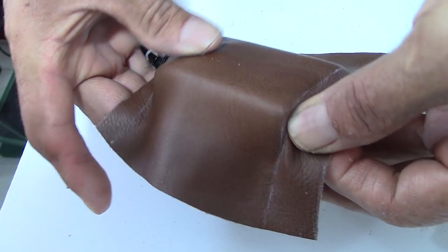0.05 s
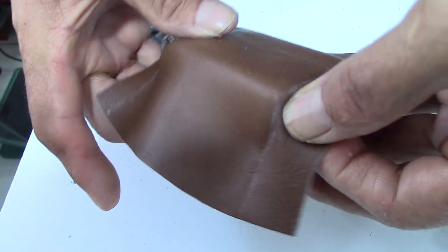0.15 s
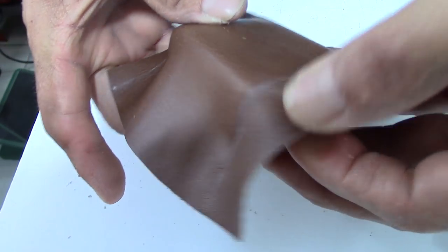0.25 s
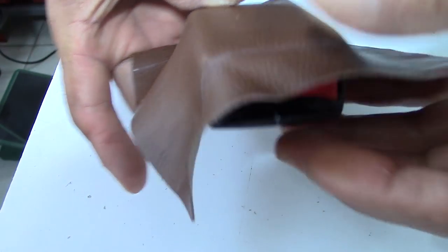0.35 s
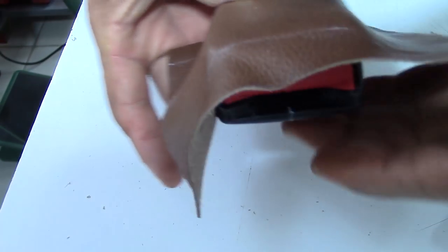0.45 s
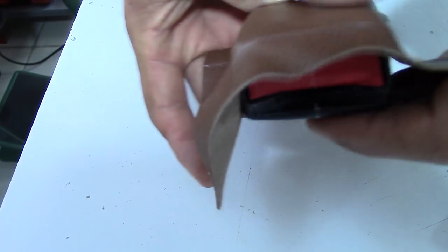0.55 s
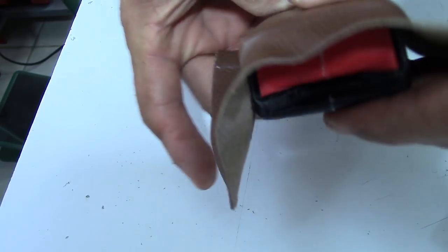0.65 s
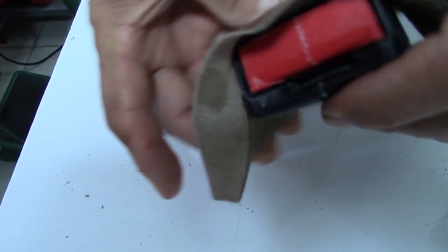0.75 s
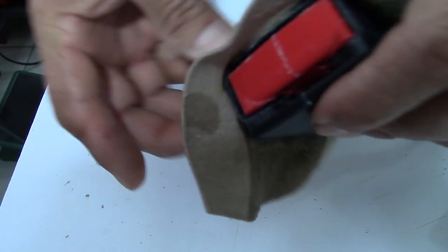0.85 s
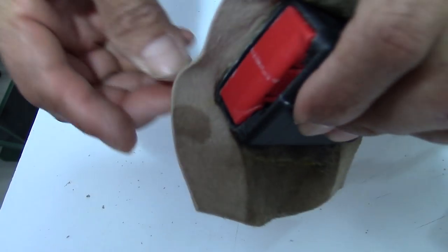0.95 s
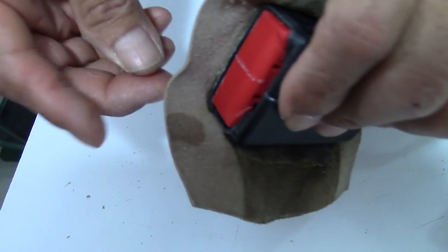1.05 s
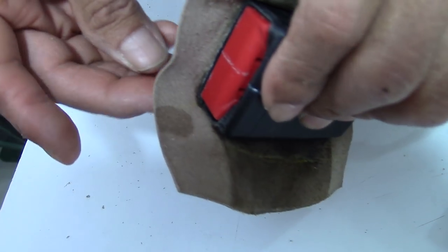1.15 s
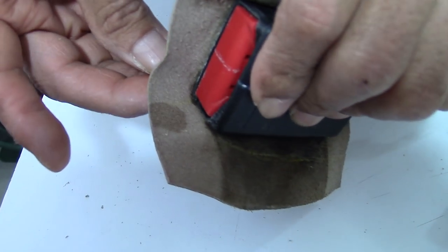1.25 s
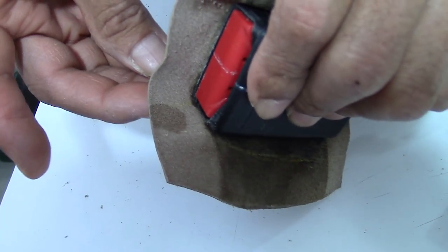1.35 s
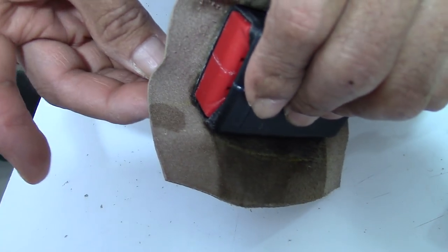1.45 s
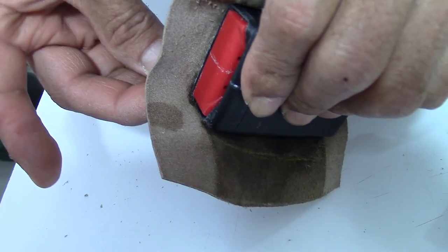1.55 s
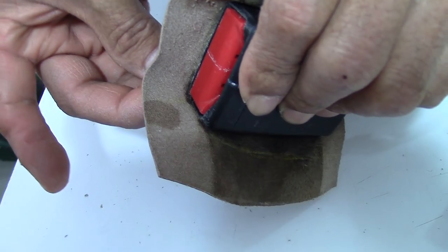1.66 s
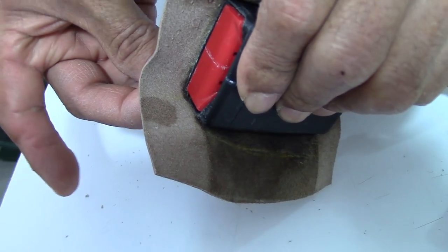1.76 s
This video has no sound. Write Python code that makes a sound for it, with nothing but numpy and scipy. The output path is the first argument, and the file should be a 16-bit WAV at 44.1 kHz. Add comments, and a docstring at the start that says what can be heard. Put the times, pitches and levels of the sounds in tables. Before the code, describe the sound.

Leather rubs on a hollow plastic case, close up in a small room. A light slide of skin leads into a knock at 0.2 seconds and a dull, rasping rub with tiny squeaks. Light ticks come around 0.55, then a stronger knock at 0.6 and a second rub, fading by 0.9. Fingers barely brush until about 1.7 seconds, over a quiet hush and faint hum.

```python
"""A small room, close up: hands work a piece of glued leather round a hollow plastic case.
A light slide of skin leads into two dull stick-slip rubs that shake the case, each set off by a knock
as the grip gives way. The leather's grain rasps and squeaks, and the shell ticks as it is turned.
Then the fingers rest, barely brushing, over the room's hush and a faint hum."""
import sys
import numpy as np
from scipy import signal
from scipy.fft import rfft, irfft, next_fast_len
from scipy.io import wavfile
from scipy.ndimage import map_coordinates

SR = 44100
rng = np.random.default_rng(int(sys.argv[2]) if len(sys.argv) > 2 else 0)


def generate_wav(signal):
    """Clip the signal to [-1, 1] and save it as 16-bit WAV at the path in sys.argv[1]."""
    frames = np.transpose(np.atleast_2d(signal))
    scaled = np.clip(frames, -1, 1) * 32767
    pcm = np.round(scaled).astype(np.int16)
    wavfile.write(sys.argv[1], SR, pcm)


N = 81585

# Envelopes of the three strokes, the rasp and the skin hiss. Each row: time in seconds, relative dB.
SLIDE_ENVELOPE = [(0, -50), (.025, -53.5), (.054, -42), (.08, -35), (.098, -38.5), (.13, -32), (.162, -30),
                  (.185, -43), (.222, -43.5)]
PUSH_ENVELOPE = [(.23, -24), (.245, -26), (.296, -21), (.33, -21), (.358, -18), (.398, -24), (.436, -37),
                 (.48, -46), (.52, -63)]
TURN_ENVELOPE = [(.615, -26), (.63, -24), (.65, -29), (.68, -22), (.716, -18), (.748, -27), (.804, -45.5),
                 (.825, -45), (.88, -58), (.95, -68)]
RASP_ENVELOPE = [(0, -67), (.05, -46.5), (.11, -81), (.158, -44), (.18, -64), (.222, -66), (.232, -36.5),
                 (.255, -33.5), (.29, -32.5), (.35, -25.5), (.395, -29.5), (.425, -47.5), (.5, -56.5),
                 (.6, -57), (.62, -51), (.66, -35.5), (.705, -30.5), (.745, -37), (.77, -59), (.81, -50),
                 (.826, -45), (.85, -66), (.9, -97)]
HISS_ENVELOPE = [(0, -73), (.025, -69.5), (.04, -51.5), (.08, -53.5), (.13, -52.5), (.18, -61),
                 (.22, -60.5), (.235, -50), (.28, -64), (.33, -56.5), (.405, -57.5), (.42, -82), (.53, -73),
                 (.56, -61.5), (.58, -69.5), (.66, -71), (.69, -51.5), (.745, -61.5), (.77, -68),
                 (.83, -62), (.87, -83)]
# Tone of each contact and of the room's hush. Each row: frequency in Hz, relative gain in dB.
SLIDE_EQ = [(30, -70), (70, -61), (105, -46), (135, -17.5), (190, -14.5), (245, -8.5), (389, -2.5),
            (455, -21), (500, -9), (590, -16.5), (757, -15.5), (1270, -20.5), (1400, -24.5), (1620, -26.5),
            (2620, -23), (3500, -35.5), (6000, -49), (12000, -78)]
PUSH_EQ = [(30, -61), (70, -58), (125, -40), (190, -11), (245, -3.5), (330, -6), (460, -7), (530, -2.5),
           (610, -14.5), (720, -3), (1000, -7.5), (1450, -12), (1850, -13.5), (2100, -30.5), (2500, -12),
           (3700, -35), (5400, -33.5), (12000, -71), (16000, -76)]
TURN_EQ = [(30, -56), (70, -63), (130, -19.5), (190, -14.5), (225, -7.5), (340, -7.5), (480, -10),
           (620, -13), (700, -4.5), (800, -9), (1100, -11), (1600, -16), (1900, -18.5), (2180, -30),
           (2900, -21.5), (3500, -29.5), (4100, -41.5), (6300, -58), (16000, -95)]
RASP_EQ = [(500, -52), (1200, 0.5), (1600, -10), (1850, 4.5), (2100, -2.5), (2500, -0.5), (3000, -5),
           (3500, -10), (4000, -13), (5500, -16), (8000, -21.5), (12000, -34.5), (16000, -64)]
HISS_EQ = [(1500, 0), (5000, -4.5), (7000, 3.5), (8800, 6), (10500, 1.5), (12000, -4), (15500, -11)]
KNOCK_EQ = [(30, -43), (90, -37), (140, -14), (190, -13), (235, 3.5), (350, -1.5), (470, -3), (650, 0.5),
            (850, -6), (1600, -9), (2100, -22.5), (2800, -14), (3500, -22.5), (3900, -29), (5500, -31.5),
            (8000, -35.5), (11000, -49), (13000, -62), (16000, -69)]
TICK_EQ = [(100, -19), (300, -10), (900, -15), (2000, -12), (3000, 0), (6500, -10), (10000, -14),
           (15000, -32.5)]
BRUSH_EQ = [(150, -4), (400, -14), (1400, 1), (2500, -7), (4500, -11.5), (9000, -17.5), (15000, -21)]
HUSH_EQ = [(15, -83), (25, -61), (53, -36), (91, -13), (113, -14), (173, -3.5), (331, -2.5), (495, -3),
           (648, -8), (703, -9), (762, -7), (970, -9), (3170, -17.5), (6730, -22), (15500, -37)]
# Resonances of the clad case. Each row: pitch in Hz, width in Hz, lift in dB before and after the turn.
CASE_MODES = [(259.2, 18, 2, -4.5), (320.8, 9.9, 7, 12), (374.6, 20.4, 0.5, 9.5), (514.5, 4.7, 4.5, -19),
              (554, 37, -23, -6), (688, 26.5, -3.5, 3), (904, 27, 0, -20), (1074, 20, -1, 1),
              (1257, 34, -6, -11.5), (1420, 25, -14, 2), (1613, 20, -27, -6), (1870, 29, -10, -0.5),
              (2330, 42, -12, -1), (3420, 18, -33, -4)]
# The thin ring of the rasp. Each row: pitch in Hz, width in Hz, lift in dB.
RASP_MODES = [(1845, 68, 6.5), (2570, 96, -1.5), (3460, 47, 12), (5750, 100, 0), (6870, 290, 0.5)]
# The shell knocked, and lightly touched. Each row: pitch in Hz, relative dB, 60 dB decay in seconds.
CLACK_MODES = [(592, -20, 0.013), (1602, -25, 0.09), (2880, -23, 0.0146), (3481, -30.5, 0.049),
               (4350, -43, 0.006), (5250, -31.5, 0.01), (7100, -36, 0.013)]
TOUCH_MODES = [(1415, 0, 0.028), (2040, -2, 0.029), (2256, 2, 0.024)]
# The grip gives way. Each row: start in seconds, relative level in dB.
KNOCK_CUES = [(0.2274, -12.5), (0.3651, -11), (.602, 2)]
# Light touches on the case. Each row: start in seconds, relative ring and snap levels in dB.
TICK_CUES = [(.5512, -36, -41), (.5528, -53, -36), (.559, -47, -34), (.5705, -61, -38.5),
             (.5958, -38.5, -27)]
# Leather on plastic. Each row: centre in seconds, length in seconds, pitch in Hz, level in dB.
SQUEAK_CUES = [(.2315, .008, 6000, -43), (0.335, 0.015, 2560, -32), (.352, 0.0061, 2550, -31.5),
               (0.382, 0.021, 2440, -30), (.407, 0.0059, 7200, -47)]
# Resting fingers. Each row: centre in seconds, length in seconds, level in dB.
BRUSH_CUES = [(0.925, 0.098, -63.5), (1.019, 0.055, -63.5), (1.554, 0.026, -68), (1.68, 0.08, -68)]
# The room's tail. Each row: frequency in Hz, 60 dB decay in seconds.
ROOM_DECAY = [(150, 0.47), (350, 0.49), (1000, 0.32), (3000, 0.35), (6000, 0.15), (14000, 0.15)]
# The hum. Each row: pitch in Hz, level in dB.
HUM_TONES = [(506, -82.5), (705, -73)]
# Stereo width of the handling and of the hush. Each row: frequency in Hz, side over mid in dB.
HANDLING_WIDTH = [(60, -20), (120, -29), (240, -61), (480, -32), (950, -26), (1890, -23.5), (3770, -14),
                  (7520, -19), (15000, -33)]
HUSH_SPREAD = [(60, -10), (150, -13.5), (380, -7.5), (950, -6.5), (2380, -8), (5980, -9.5), (15000, -9.5)]

TURNED_S = .55  # the grip changes here
WALL_GAP_S, SMEAR_S = 0.0047, 0.0022  # reflections off the walls, and off hands and table


def rubbing():
    """The main action: a light slide, a push round the case and a rub as it is turned."""
    return (stroke(SLIDE_ENVELOPE, SLIDE_EQ, gain_db=0.4, ring_db=-4.5, wet_db=-9)
            + stroke(PUSH_ENVELOPE, PUSH_EQ, gain_db=-0.76, ring_db=5.5, wet_db=-13)
            + stroke(TURN_ENVELOPE, TURN_EQ, gain_db=0.0, ring_db=2.5, wet_db=-9))


def stroke(envelope, eq, gain_db, ring_db, wet_db, attack_s=0.0071):
    """One rub: the leather catches and slips, shaking the case."""
    t = np.arange(N) / SR
    start, end = envelope[0][0], envelope[-1][0]
    gate = np.clip(1 + np.minimum(t - start, (end - t) / 10) / attack_s, 0, 1)  # tenfold release
    friction = smear(slips(median_hz=300, scatter=.45, spread_db=1), near_db=7.5)
    shaken = resonate(coloured(friction, eq), grip(start > TURNED_S), ring_db)
    return amp(gain_db) * gate * level(envelope) * unit(room(shaken, wet_db))


def slips(median_hz, scatter, spread_db, count=6000):
    """Stick-slip: pulses of uneven spacing and size."""
    gap, size = rng.standard_normal((count, 2)).T
    at = (np.cumsum(np.exp(scatter * gap)) / median_hz * SR).astype(int)
    pulses = np.bincount(at[at < N], amp(spread_db * size)[at < N], N)
    return unit(pulses - pulses.mean())


def grip(turned):
    """The grip decides which of the case's resonances ring, before or after the turn."""
    return [(hz, width, after if turned else before) for hz, width, before, after in CASE_MODES]


def knocks():
    """As the grip gives way the case thumps and its shell clacks."""
    thump = 0
    for s, db in KNOCK_CUES:
        hit = smear(taps([(s, db)], KNOCK_EQ), near_db=-0.5)
        thump += resonate(hit, grip(s > TURNED_S), ring_db=-2.5)
    clack = smear(shell_ring(KNOCK_CUES, CLACK_MODES), near_db=-7)
    return room(amp(-5.5) * thump, wet_db=-7.5) + room(amp(-2) * clack, wet_db=-7.5)


def shell_ring(cues, modes, low_cut_hz=348):
    """Each contact sets off damped modes, ringing with little bass."""
    t = np.arange(SR // 10) / SR
    ring = sum(amp(db - 60 * t / t60) * np.sin(2 * np.pi * hz * t) for hz, db, t60 in modes)
    low_cut = signal.butter(2, low_cut_hz, btype="high", fs=SR, output="sos")
    return signal.sosfilt(low_cut, signal.fftconvolve(impulses(cues), ring)[:N])


def scraping():
    """The grain of the leather rasps, and skin hisses over its smooth face."""
    grit = slips(median_hz=5000, scatter=.9, spread_db=5.5, count=14000)
    rasp = unit(resonate(coloured(grit, RASP_EQ), RASP_MODES, ring_db=-4))
    hiss = noise(HISS_EQ) * amp(1.46 * wobble(150))
    return room(amp(-5) * level(RASP_ENVELOPE) * rasp, wet_db=-8.5) + level(HISS_ENVELOPE) * hiss


def squeaks(half_width_hz=130):
    """Brief, narrow, high chirps where the leather sticks."""
    chirps = 0
    for s, length, pitch, db in SQUEAK_CUES:
        band = filtered(rng.standard_normal(N), lambda hz: 1 / (1 + ((hz - pitch) / half_width_hz) ** 2))
        chirps += amp(db) * swell(s, length) * unit(band)
    return chirps


def ticks():
    """Fingers touch the shell: a tiny snap and a short ring."""
    ring = shell_ring([(s, db) for s, db, _ in TICK_CUES], TOUCH_MODES)
    snap = taps([(s, db) for s, _, db in TICK_CUES], TICK_EQ)
    return room(ring + smear(snap, near_db=1), wet_db=-25)


def brushes():
    """Fingers shift a little on the held leather."""
    return sum(amp(db) * swell(s, length) for s, length, db in BRUSH_CUES) * noise(BRUSH_EQ)


def smear(x, near_db):
    """Reflections off hands and table smear the treble over a few milliseconds."""
    fade = np.exp(-np.arange(SR // 40) / SR / SMEAR_S)
    reflections = rng.standard_normal(len(fade)) * fade * (1 - fade)
    echo = signal.fftconvolve(x, reflections / np.linalg.norm(reflections))[:N]
    treble = lambda hz: amp(near_db) * hz / (hz + 2000)
    direct = filtered(x, lambda hz: 1 / np.hypot(1, treble(hz)))
    return direct + filtered(echo, lambda hz: treble(hz) / np.hypot(1, treble(hz)))


def room(x, wet_db):
    """Direct sound plus a short tail that dies sooner in the treble."""
    hz, t, spectrum = signal.stft(rng.standard_normal(SR // 2), SR, nperseg=256)
    decay = amp(-60 * t / along(ROOM_DECAY, hz)[:, None])
    tail = signal.istft(spectrum * decay, SR, nperseg=256)[1]
    tail *= 1 - np.exp(-(np.arange(len(tail)) / SR / WALL_GAP_S) ** 2)  # soft onset
    return x + amp(wet_db) * signal.fftconvolve(x, tail / np.linalg.norm(tail))[:N]


def room_tone(hush_db=-61.5, right_lean_db=.6):
    """The bed: a steady hush with a faint, slightly unsteady hum."""
    t = np.arange(N) / SR
    hum = sum(amp(db) * np.sqrt(2) * np.sin(2 * np.pi * hz * t + 0.35 * wobble(8.4))
              for hz, db in HUM_TONES)
    mid, side = amp(hush_db) * noise(HUSH_EQ, shape=(2, N))
    side = coloured(side, HUSH_SPREAD)
    pan = amp([[-right_lean_db / 2], [right_lean_db / 2]])
    return pan * (np.array([mid + side, mid - side]) + hum)


def resonate(x, modes, ring_db):
    """The contact itself plus the resonances it excites."""
    def response(hz):
        return sum(amp(db) * 1j * hz * width / (pitch ** 2 - hz ** 2 + 1j * hz * width)
                   for pitch, width, db in modes)
    return x + amp(ring_db) * filtered(x, response)


def taps(cues, eq):
    """Single contacts, each peaking at its level."""
    return coloured(impulses(cues), eq) / np.abs(coloured(signal.unit_impulse(N), eq)).max()


def impulses(cues):
    """One impulse for each (s, dB) cue."""
    s, db = np.transpose(cues)
    return np.bincount(np.round(s * SR).astype(int), amp(db), N)


def noise(eq, shape=N):
    """Coloured noise at rms 1."""
    return unit(coloured(rng.standard_normal(shape), eq))


def coloured(x, eq):
    """Minimum-phase EQ through (Hz, dB) points, so nothing rings ahead of a hit."""
    def response(hz):
        cepstrum = irfft(np.log(amp(along(eq, hz)) + 1e-6))
        half = len(cepstrum) // 2
        cepstrum[1:half] *= 2
        cepstrum[half + 1:] = 0
        return np.exp(rfft(cepstrum))
    return filtered(x, response)


def filtered(x, response):
    """Apply a complex frequency response."""
    size = 2 * next_fast_len(N)
    return irfft(rfft(x, size) * response(np.fft.rfftfreq(size, 1 / SR)), size)[..., :N]


def level(envelope):
    """Gain per sample from (s, dB) points."""
    return amp(np.interp(np.arange(N) / SR, *np.transpose(envelope)))


def swell(s, length):
    """A bell-shaped rise and fall about time s."""
    return np.exp(-2 * ((np.arange(N) / SR - s) / length) ** 2)


def wobble(rate):
    """A smooth random curve, rate knots a second."""
    return map_coordinates(rng.standard_normal(int(N * rate / SR) + 4), [np.arange(N) * rate / SR])


def along(points, hz):
    """Interpolate (Hz, value) points on a log axis."""
    freqs, values = np.transpose(points)
    return np.interp(np.log(hz + 1), np.log(freqs + 1), values)


def amp(db):
    """Decibels to gain."""
    return 10 ** (np.asarray(db) / 20)


def unit(x):
    """Scale to rms 1."""
    return x / np.sqrt(np.mean(x ** 2) + 1e-20)


def scene():
    """Nearly mono handling, widened by a slight phase shift, over the room tone."""
    mid = rubbing() + scraping() + squeaks() + knocks() + ticks() + brushes()
    comb = lambda hz: np.sqrt(2) * np.cos(2 * np.pi * hz * WALL_GAP_S)
    side = filtered(mid, lambda hz: 1j * amp(along(HANDLING_WIDTH, hz)) * comb(hz))
    return np.array([mid + side, mid - side]) + room_tone()


def record(dry, top_hz=15800):
    """A brick-wall high cut on the mix."""
    return filtered(dry, lambda hz: hz < top_hz)


dry = scene()
out = record(dry)
generate_wav(out)
```